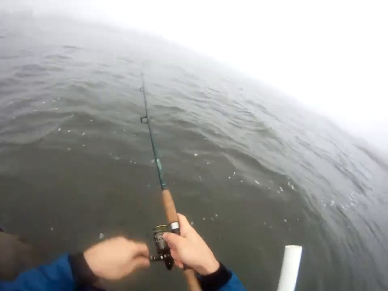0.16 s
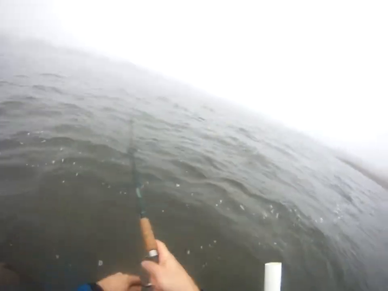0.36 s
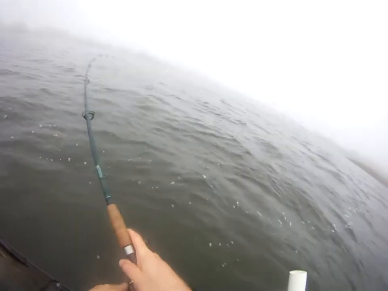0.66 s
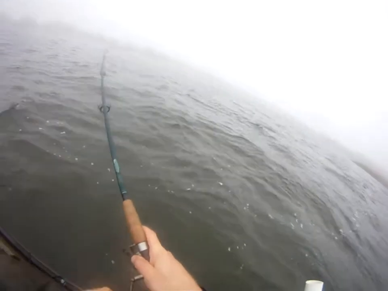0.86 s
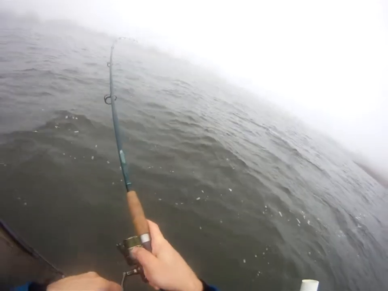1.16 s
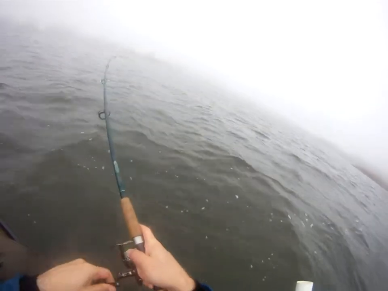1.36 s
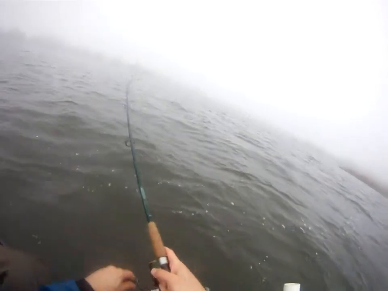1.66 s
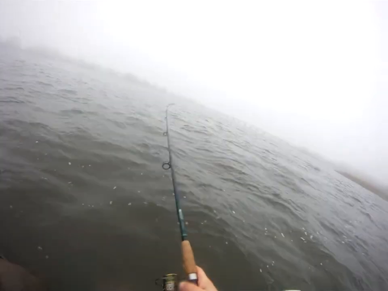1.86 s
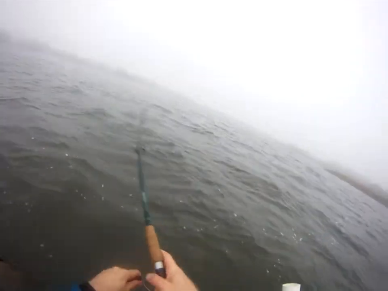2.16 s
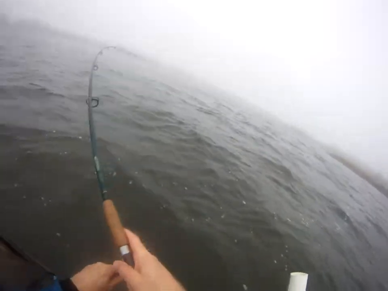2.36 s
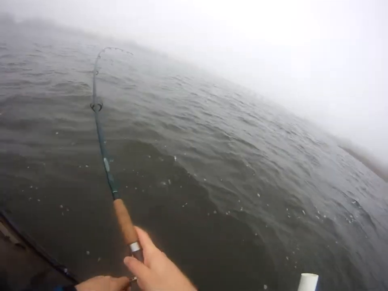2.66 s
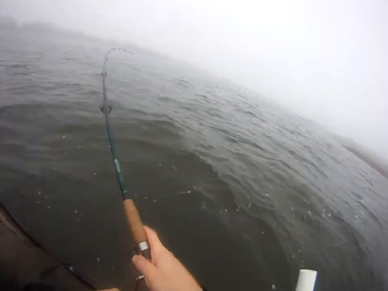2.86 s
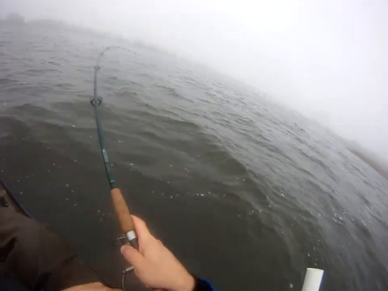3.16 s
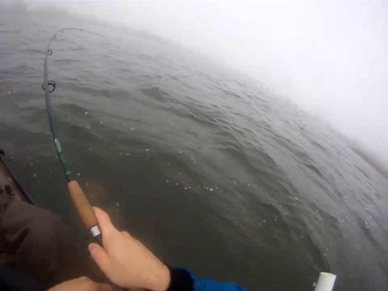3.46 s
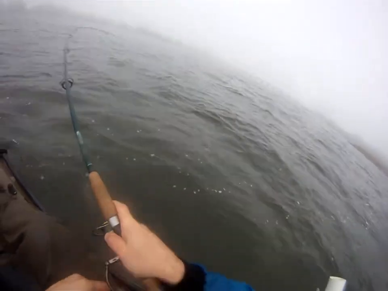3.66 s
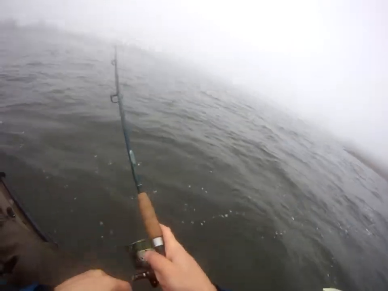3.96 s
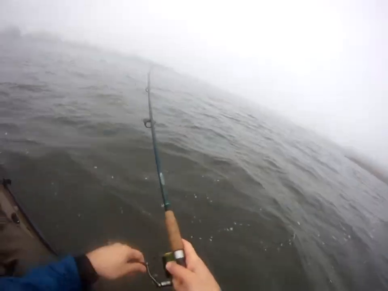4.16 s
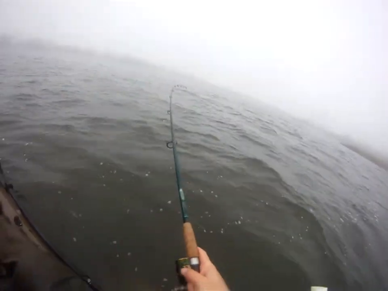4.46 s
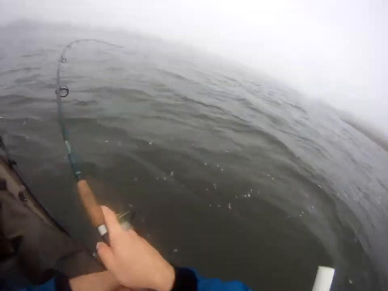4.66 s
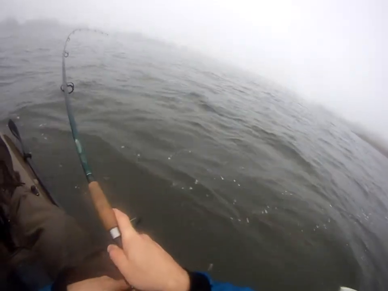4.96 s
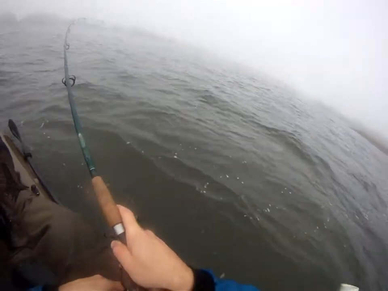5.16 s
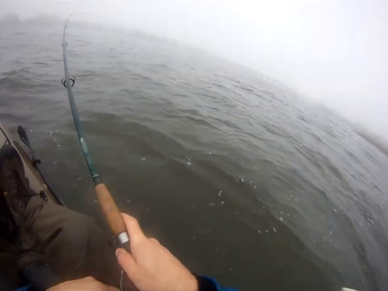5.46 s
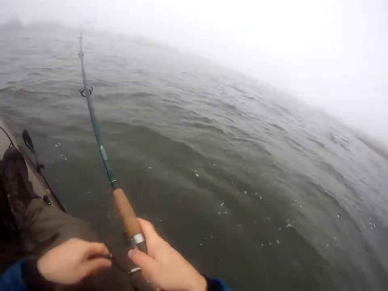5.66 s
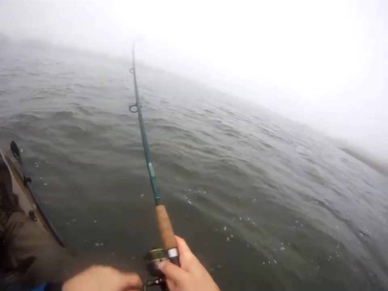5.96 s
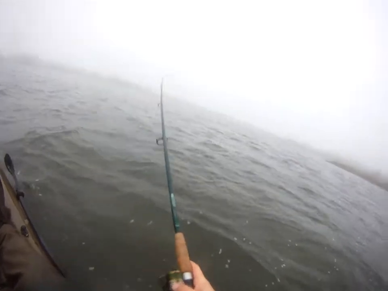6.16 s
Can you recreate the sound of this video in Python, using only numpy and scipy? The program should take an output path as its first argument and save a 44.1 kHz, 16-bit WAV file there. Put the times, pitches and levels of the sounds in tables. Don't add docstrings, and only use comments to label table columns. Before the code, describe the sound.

Throughout, low unsteady wind rumble, dull water slosh and faint hiss press on a small sealed microphone on a kayak; everything is close, boxy, nearly mono and gritty in the treble. A light knock at 0.1 s leads into a whirring drag pull from 0.2 to 0.6 s, with rubbing, a quick rising and falling squeak near 0.45 and two stronger hollow knocks at 0.4 and 0.5. Thin metallic ticks rattle unevenly from 0.6 to 2.1 s. A rough whirr and scrape fill 2.1 to 2.4, then dense ticking until 2.9, knocks at 2.9 and 3.0, and another fast run from 3.1 to 3.5. Sparser ticks continue. At 4.55 to 4.75 the last hard pull whirrs, scrapes and squeaks, leaping high then falling. Ticks thin out and stop by 5.2; taps continue to 5.5, with soft line hiss peaking near 5.65, then rumble and light rubbing to 6.3 s.

```python
import sys
import numpy as np
from scipy import signal
from scipy.fft import rfft, irfft, next_fast_len
from scipy.io import wavfile
from scipy.ndimage import map_coordinates

SR = 44100
rng = np.random.default_rng(int(sys.argv[2]) if len(sys.argv) > 2 else 0)


def how_loud(loudness_db):
    steps = np.asarray(loudness_db, float) / 20
    return 10 ** steps


def generate_wav(sig):
    pcm = np.round(np.clip(np.atleast_2d(sig).T, -1, 1) * 32767).astype(np.int16)
    wavfile.write(sys.argv[1], SR, pcm)


N = 278271
SLOW_RATE_HZ, HOLD_STEPS, TOP_HZ = 12000, 4, 15300
HISS_DB = -65
STRIKE_S = np.arange(1500) / SR

# start in seconds, peak level in dB.
TICKS = [(0.2135, -59), (0.3131, -50), (0.6263, -51), (0.6417, -58), (0.652, -65), (0.6579, -56),
         (0.6645, -58), (0.6713, -52), (0.677, -55), (0.6836, -51), (0.6901, -54), (0.6963, -60),
         (0.7026, -63), (0.709, -62), (0.7293, -63), (0.7351, -57), (0.7414, -56), (0.7483, -57),
         (0.7755, -62), (0.7862, -55), (0.7987, -50.5), (0.8126, -54), (0.83, -54), (0.859, -53),
         (0.982, -56), (1.0183, -64), (1.0297, -65), (1.1015, -51), (1.1583, -56), (1.174, -61),
         (1.1811, -56), (1.196, -55), (1.2202, -64), (1.2402, -62), (1.2601, -58), (1.2901, -54),
         (1.328, -54), (1.3629, -53), (1.3914, -55.5), (1.4155, -56), (1.4424, -58), (1.4745, -57),
         (1.4944, -64), (1.5049, -64), (1.5121, -53), (1.5307, -59), (1.5382, -61), (1.5641, -54),
         (1.6077, -53), (1.615, -64), (1.6503, -64), (1.7063, -68), (1.814, -61), (1.8626, -67),
         (1.8731, -65), (1.8919, -66), (1.906, -66), (1.9314, -48.5), (1.9608, -52), (1.9776, -64),
         (1.9902, -57), (2.0076, -63), (2.0173, -54), (2.0358, -54), (2.0475, -55), (2.0565, -54),
         (2.063, -56), (2.0691, -58), (2.0759, -55), (2.4, -52), (2.4527, -51), (2.4956, -49), (2.523, -49),
         (2.5555, -49.5), (2.5905, -48), (2.613, -49.5), (2.631, -51), (2.646, -52.5), (2.6588, -55),
         (2.6702, -61), (2.6833, -60), (2.6915, -53), (2.6992, -55), (2.708, -52), (2.7152, -53),
         (2.7235, -50), (2.7316, -54), (2.74, -56), (2.7488, -54), (2.758, -51), (2.7675, -50),
         (2.777, -55), (2.7866, -49), (2.798, -52), (2.809, -50), (2.8198, -51), (2.8302, -52),
         (2.8446, -58), (2.8633, -56.5), (2.8757, -57), (2.8862, -54), (2.896, -50), (2.91, -51),
         (2.9298, -52), (3.0763, -54.5), (3.1095, -56), (3.133, -55), (3.1544, -56), (3.1736, -52),
         (3.1885, -51), (3.2014, -46), (3.2119, -45), (3.2208, -62.5), (3.2289, -49), (3.2365, -56),
         (3.2432, -55), (3.2499, -58), (3.262, -62), (3.2686, -50), (3.2755, -51), (3.2827, -52),
         (3.291, -52), (3.2993, -54), (3.3091, -57), (3.3174, -50), (3.328, -53), (3.3436, -50),
         (3.3637, -48), (3.3905, -47), (3.4062, -45), (3.4268, -47.5), (3.446, -49), (3.4655, -51),
         (3.4767, -61), (3.4887, -51.5), (3.5418, -51.5), (3.6109, -49), (3.6723, -59), (3.7474, -54.5),
         (3.8037, -54.5), (3.8636, -57), (3.995, -56.5), (4.031, -58), (4.0613, -58), (4.101, -55),
         (4.14, -58), (4.1649, -53), (4.1707, -62), (4.1838, -52), (4.1972, -54), (4.2121, -55),
         (4.2251, -55), (4.2393, -61), (4.2452, -66), (4.2766, -64), (4.341, -56), (4.3491, -63),
         (4.3572, -63), (4.3685, -61), (4.3903, -57), (4.4086, -57), (4.4295, -53), (4.4627, -59),
         (4.5437, -61), (4.7481, -46.5), (4.756, -51), (4.7838, -53), (4.7936, -51), (4.804, -50),
         (4.8257, -49), (4.8819, -58), (4.917, -50), (5.0107, -51), (5.0582, -50), (5.0977, -50.5),
         (5.1356, -64), (5.145, -49.5), (5.2215, -48.5)]
# time in seconds, level in dB.
WHIRR = [
    [(0.19, -79), (0.198, -87), (0.212, -67.5), (0.364, -65.5), (0.496, -54), (0.504, -60), (0.574, -58),
     (0.616, -84.5), (0.63, -64)],
    [(0.64, -78), (0.668, -65), (0.758, -67), (0.764, -75), (0.78, -66)],
    [(2.07, -70.5), (2.13, -50), (2.14, -60), (2.192, -51.5), (2.306, -56), (2.314, -46.5), (2.404, -71),
     (2.41, -83)],
    [(3.19, -78), (3.222, -59), (3.26, -67), (3.268, -74), (3.33, -75)],
    [(4.54, -74), (4.564, -56), (4.58, -58.5), (4.618, -49), (4.626, -59), (4.644, -51.5), (4.79, -64.5)],
]
# time in seconds, level in dB.
GUIDES = [(5.3, -93.5), (5.312, -101.5), (5.33, -86), (5.652, -72), (5.768, -85), (5.8, -90)]
# time in seconds, effort in dB, then low body, squeal and upper modes
# in dB against effort, centre of the main band in Hz.
RUB = [(0.0, -57, -13, -16, -9, 2120), (0.16, -62.5, -5, -11, -4, 1960),
       (0.24, -42.5, -6.5, -29, -10, 1910), (0.39, -56, -4.5, -7, -3.5, 2000),
       (0.42, -46.5, -6, -16, -12, 2080), (0.44, -51.5, -5, -3.5, -4.5, 2110),
       (0.51, -47, -13, -8, -1, 1980), (0.56, -50.5, -12.5, -10, -9, 1960), (0.6, -49, -10, -17, -8, 1900),
       (0.61, -59, -4.5, -12, -5.5, 1900), (0.88, -64.5, -8.5, -12, -9.5, 2110),
       (1.16, -59, -8.5, -11, -8.5, 2130), (1.32, -75.5, -1, -9, -10, 2070),
       (1.53, -58, -14, -8, 1.5, 1970), (1.56, -66.5, -4, 2, -3, 2120), (1.69, -68.5, -5, -14, -7, 1980),
       (1.76, -62.5, -7, -4, -4.5, 2010), (1.83, -59, -18, -19, -12.5, 1980),
       (2.05, -63.5, -4, -6, -3, 1940), (2.11, -53, -6.5, -2.5, -17, 2050), (2.13, -61, 3, -4, 14, 1990),
       (2.14, -43, -24, 0, -12, 1950), (2.18, -55.5, -8, -4, 12.5, 2070), (2.23, -49.5, -10, 0, -2, 1970),
       (2.25, -43.5, -14, -23, -6.5, 1930), (2.28, -49, -18, -4, -1, 1900), (2.3, -46, -8, -15, -11, 1920),
       (2.34, -50.5, -10, -1, -5, 1990), (2.39, -54, -13, -19, -12, 2020),
       (2.53, -59.5, -6, -24.5, -20, 1900), (2.56, -74.5, 4, -6, 0, 2040), (2.71, -68.5, -2, -3, -2, 2150),
       (3.13, -76, 0, -7, -2.5, 2040), (3.22, -56, -8.5, -8.5, -8.5, 1970), (3.8, -76.5, -3, -11, -2, 2100),
       (3.95, -61, -10, -14, -7, 2060), (3.99, -62, -3, -7, 5.5, 2180), (4.04, -53.5, -19, -19, -18, 2250),
       (4.06, -60, -4.5, -9, -3.5, 2130), (4.18, -56, -11, -16, -11.5, 2010), (4.24, -72, -5, -6, -6, 1950),
       (4.27, -63, 3, -20.5, -5, 1960), (4.31, -62.5, -0.5, -11, -12, 2200),
       (4.36, -53, -12, -15, -9.5, 2310), (4.44, -79, -3, -6, -8, 2030), (4.48, -59.5, -3, -17, -12, 2040),
       (4.53, -66.5, 2, -8, -3.5, 1960), (4.57, -49, -10, -13, -8, 1940), (4.59, -46, -15, -1, -7, 2010),
       (4.6, -50.5, -7, 11.5, 6.5, 1970), (4.66, -49.5, -18, 9, 2, 2000), (4.69, -42.5, -6, -7, -11, 1970),
       (4.71, -42.5, -15, -14, -8, 1920), (4.75, -50, -8, 2, -7, 1880), (4.85, -74.5, 0, -10, -17, 2030),
       (4.88, -54, -24.5, -15, -2, 2280), (4.9, -71, -1, -10, -7, 2120), (5.06, -67.5, -4, -9, -13, 1900),
       (5.13, -63, -4, -11, -11, 2260), (5.2, -64, -6, -12, -19, 2170),
       (5.43, -58.5, -9.5, -9.5, -6.5, 2020), (5.9, -57.5, -17, -17.5, -12.5, 2320),
       (6.03, -57, -8, -14.5, -9, 2100), (6.06, -50.5, -7.5, -20.5, -13, 2070),
       (6.13, -57.5, -11, -11, -15, 2010), (6.22, -54.5, -17, -16, -9.5, 1930),
       (6.31, -61.5, -10, -21, -12, 2020)]
# time in seconds, pitch in Hz, level in dB.
SQUEAKS = [
    [(.405, 2100, -70), (.42, 2200, -46), (.458, 2480, -39), (.48, 2000, -48), (.5, 1930, -67.5)],
    [(4.55, 1850, -65), (4.575, 2050, -49), (4.6, 3050, -54), (4.655, 3060, -50), (4.68, 2400, -49),
     (4.705, 1950, -50), (4.73, 1860, -70)],
]
# start in seconds, peak level in dB, pitch in Hz, t60 in seconds.
KNOCKS = [(0.086, -36.5, 1950, 0.0093), (0.413, -28.5, 2160, 0.021), (0.516, -29, 2180, 0.012),
          (2.867, -35, 2182, 0.0072), (3.01, -34.5, 1065, 0.0087), (4.265, -35, 2000, 0.014),
          (4.881, -38, 2260, 0.013), (5.134, -40.5, 2300, 0.032), (5.263, -43, 2000, 0.01716),
          (5.459, -37, 1750, 0.01), (5.52, -35, 1970, 0.011)]
# time in seconds, rumble in dB, slosh in dB.
WIND = [(0.0, -42, -63.5), (0.09, -45.5, -62), (0.12, -50, -64.5), (0.24, -40.5, -59), (0.28, -48, -59),
        (0.35, -41.5, -60.5), (0.49, -41.5, -64), (0.56, -40, -63), (0.86, -46, -63.5), (0.91, -56, -67),
        (0.95, -49.5, -62), (1.26, -47.5, -63), (1.6, -52, -65), (1.65, -45, -62.5), (1.92, -43, -63.5),
        (2.07, -41.5, -59.5), (2.44, -38, -62), (2.65, -50.5, -61.5), (3.02, -52.5, -60.5),
        (3.25, -46, -64), (3.32, -48, -61), (3.46, -46.5, -63), (3.57, -45.5, -64), (3.67, -54.5, -64.5),
        (3.9, -48, -62.5), (4.11, -49, -61), (4.18, -40.5, -61.5), (4.32, -59, -63), (4.46, -44, -61.5),
        (4.6, -46.5, -61), (4.67, -40, -55.5), (4.8, -41.5, -62), (4.9, -51.5, -61), (4.97, -44, -64),
        (5.08, -54, -63.5), (5.33, -46, -62), (5.39, -51, -62), (5.66, -55, -58.5), (5.8, -51.5, -62.5),
        (6.01, -44, -61.5), (6.31, -49, -61)]

# centre in Hz, width in Hz, level in dB.
SPRING = [(4830, 166, -1.9), (5380, 290, -0.37)]
SPOOL = [(4420, 93, -5.5), (5130, 180, 1.5)]
BODY = [(1178, 266, 4.5), (857, 230, -3.5)]
MAIN = [(1938, 173, 2), (2180, 275, 1), (2383, 220, -7.5)]
SQUEAL = [(3028, 120, -6), (2903, 57, -7.5)]
UPPER = [(3572, 190, -1.5), (3746, 173, -5.5)]

# frequency in Hz, density in dB per Hz.
BROAD = [(400, -32), (800, -4), (1500, -0.5), (2600, -7), (3900, -2), (4100, -17), (5900, -33)]
RUMBLE = [(3.5, -40), (6.0, -2), (16, 6), (26, 0.5), (49, -3), (81, -21.5), (110, -20), (140, -55),
          (240, -120)]
SLOSH = [(41, -33), (70, -2), (172, -11), (262, -13.5), (363, -21.5), (600, -30.5), (780, -31),
         (1320, -120)]
HISS = [(240, -16), (400, -1.5), (955, -3), (1210, -2.5), (1470, -6.5), (2230, -1), (2760, -7.5),
        (3660, -14), (4150, -11), (4910, -8), (5950, -13.5), (7740, -65), (13100, -120)]


def unit(x):
    return x / np.sqrt(np.mean(x ** 2) + 1e-20)


def curves(rows):
    time_s, *columns = np.transpose(rows)
    at_s = np.arange(N) / SR
    lasts = time_s[-1] > 6
    return [np.interp(at_s, time_s, c, left=-120, right=c[-1] if lasts else -120) for c in columns]


def wobble(rate_hz):
    coarse = np.arange(0, N + 16, 16)
    knots = rng.standard_normal(int(N * rate_hz / SR) + 4)
    smooth = map_coordinates(knots, [coarse * rate_hz / SR])
    return np.interp(np.arange(N), coarse, smooth)


def filtered(x, response):
    size = next_fast_len(N + 8192)
    spectrum = rfft(x, size) * response(np.fft.rfftfreq(size, 1 / SR))
    return irfft(spectrum, size)[..., :N]


def coloured(points):
    hz, db = np.transpose(points)
    shape = lambda f: how_loud(np.interp(np.log(f + 1), np.log(hz + 1), db))
    return unit(filtered(rng.standard_normal(N), shape))


def mode(f, hz, width_hz):
    return 1j * f * width_hz / (hz * hz - f * f + 1j * f * width_hz)


def ring(x, modes, flicker_db, centre_hz=None):
    bank = lambda f: np.array([how_loud(db) * mode(f, hz, width_hz) ** 2 for hz, width_hz, db in modes])
    total = np.zeros(N)
    for part, (hz, _, _) in zip(filtered(x, bank), modes):
        lead = 1 if centre_hz is None else how_loud(-5 * np.abs(centre_hz - hz) / 300)
        flare = how_loud(flicker_db * (wobble(35) + 0.76 * wobble(8)))
        total += lead * flare * part
    return unit(total)


def scrape(rough_db, clump_db):
    return rng.standard_normal(N) * how_loud(rough_db * wobble(300) + clump_db * wobble(40))


def drag_ticks():
    out = np.zeros(N + SR)
    attack = 1 - np.exp(-STRIKE_S / 0.0004)
    for start_s, peak_db in TICKS:
        pluck = np.zeros(len(STRIKE_S))
        for hz, width_hz, mode_db in SPRING:
            level_db = mode_db + 1.3 * rng.standard_normal()
            pitch_hz = hz * (1 + 0.008 * rng.standard_normal())
            decay = np.exp(-0.9 * np.pi * width_hz * STRIKE_S)
            pluck += how_loud(level_db) * np.sin(2 * np.pi * pitch_hz * STRIKE_S) * decay
        pluck *= attack
        out[round(start_s * SR):][:len(STRIKE_S)] += how_loud(peak_db + 1.5) * pluck / np.abs(pluck).max()
    return out[:N]


def drag_whirr():
    level = sum(how_loud(curves(rows)[0]) for rows in WHIRR)
    friction = scrape(rough_db=3.0, clump_db=-1.0)
    return how_loud(0.5) * level * ring(friction, SPRING + SPOOL, flicker_db=1.0)


def line_in_guides():
    level_db, = curves(GUIDES)
    return how_loud(level_db) * ring(rng.standard_normal(N), [(5580, 220, 0)], flicker_db=1.5)


def rubbing():
    effort_db, body_db, squeal_db, upper_db, centre_hz = curves(RUB)
    contact = scrape(rough_db=2.5, clump_db=0.12)
    tones = ring(contact, MAIN, 1.75, centre_hz)
    tones += how_loud(body_db - 1.0) * ring(contact, BODY, flicker_db=1.4)
    tones += how_loud(squeal_db + 0.5) * ring(contact, SQUEAL, flicker_db=-0.2)
    tones += how_loud(upper_db) * ring(contact, UPPER, flicker_db=2.0)
    hz, db = np.transpose(BROAD)
    shape = lambda f: how_loud(np.interp(f, hz, db, right=-120))
    broad = unit(filtered(scrape(rough_db=3.5, clump_db=4.5), shape))
    return how_loud(effort_db - 1.22) * (tones + how_loud(-1.0 + 0.61 * body_db) * broad)


def squeaks():
    slip = np.zeros(N)
    for rows in SQUEAKS:
        hz, db = curves(rows)
        phase = 2 * np.pi * np.cumsum(hz * (1 + 0.031 * wobble(150))) / SR
        slip += how_loud(db + 2.4 * wobble(100)) * np.sin(phase)

    def housing(f):
        modes = enumerate(MAIN + SQUEAL)
        return sum((-1) ** k * how_loud(db) * mode(f, hz, width_hz) for k, (hz, width_hz, db) in modes)

    return filtered(slip, housing)


def knocks():
    out = np.zeros(N + SR)
    attack = 1 - np.exp(-STRIKE_S / 0.00094)
    for start_s, peak_db, hz, t60_s in KNOCKS:
        tone = np.sin(2 * np.pi * hz * STRIKE_S) * how_loud(-60 * STRIKE_S / t60_s)
        burst = 1.35 * rng.standard_normal(len(STRIKE_S)) * how_loud(-60 * STRIKE_S / 0.0065)
        out[round(start_s * SR):][:len(STRIKE_S)] += how_loud(peak_db + 0.5) * (tone + burst) * attack
    return filtered(out[:N], lambda f: 1 / (1 + (f / 2800) ** 4))


def wind():
    rumble_db, slosh_db = curves(WIND)
    rumble = how_loud(rumble_db) * unit(how_loud(1.3 * wobble(7)) * coloured(RUMBLE))
    slosh = how_loud(slosh_db + 2.5) * unit(how_loud(0.73 * wobble(15)) * coloured(SLOSH))
    hiss = how_loud(HISS_DB + 1.2 * wobble(2.97)) * coloured(HISS)
    return rumble + slosh + hiss


def scene():
    reel = drag_ticks() + drag_whirr() + line_in_guides()
    mono = reel + rubbing() + squeaks() + knocks() + wind()
    apart = how_loud(-78.5) * coloured([(80, -60), (200, -9), (500, -2.5), (2000, -4), (5000, -3), (6000, -44)])
    return np.array([mono + apart, mono - apart])


def low_pass(x):
    return signal.sosfilt(signal.butter(12, 16170, fs=SR, output="sos"), x)


def record(dry):
    def lift(f):
        droop = np.sinc(np.minimum(f / SLOW_RATE_HZ, 0.5))
        return (f < SLOW_RATE_HZ / 2) / droop / (1 + (f / 5800) ** 30)

    x = filtered(dry, lift)
    bridge = np.linspace(x[:, -1], x[:, 0], 1470, axis=1)
    x = np.hstack([x, bridge])
    slow = signal.resample(x, x.shape[1] * SLOW_RATE_HZ // SR, axis=1)
    stepped = np.repeat(slow, HOLD_STEPS, axis=1)
    held = signal.resample(stepped, x.shape[1], axis=1)[:, :N]
    mix = filtered(held, lambda f: f < TOP_HZ)
    return low_pass(mix)


dry = scene()
out = record(dry)
generate_wav(out)
```